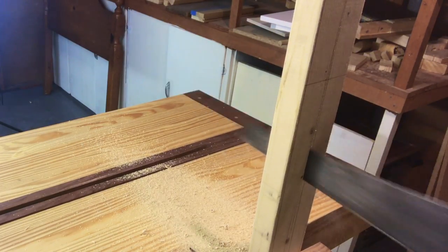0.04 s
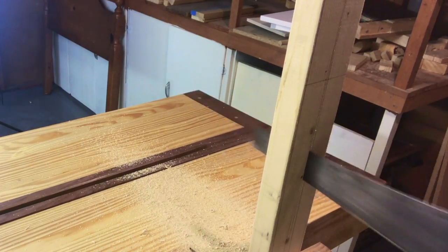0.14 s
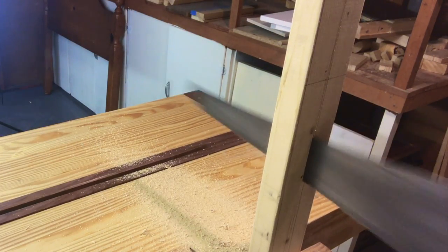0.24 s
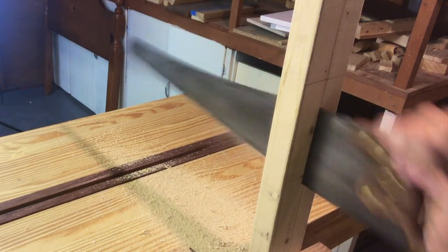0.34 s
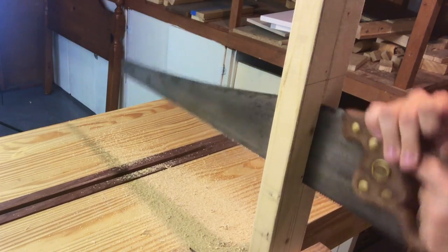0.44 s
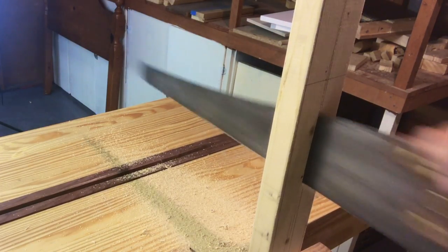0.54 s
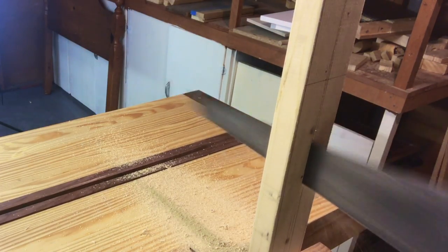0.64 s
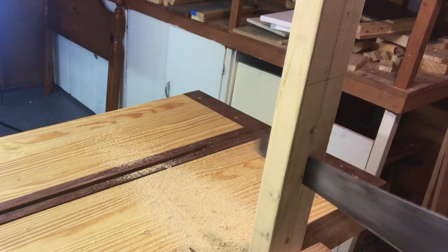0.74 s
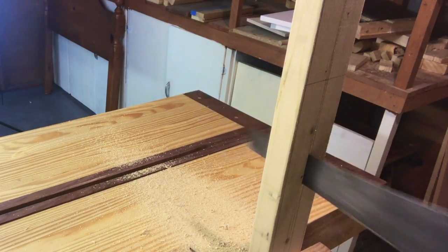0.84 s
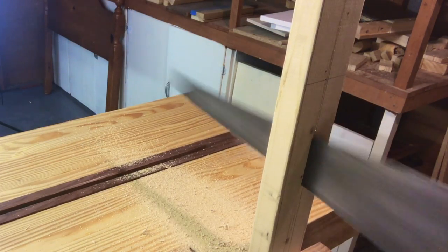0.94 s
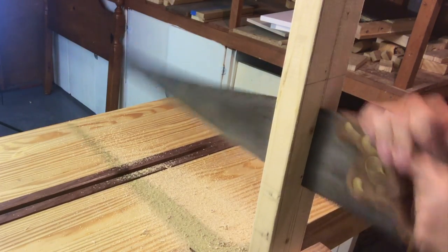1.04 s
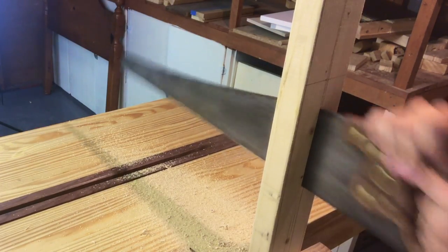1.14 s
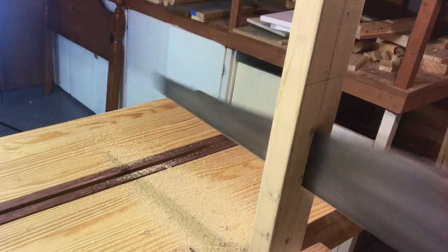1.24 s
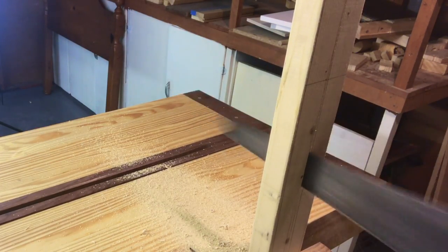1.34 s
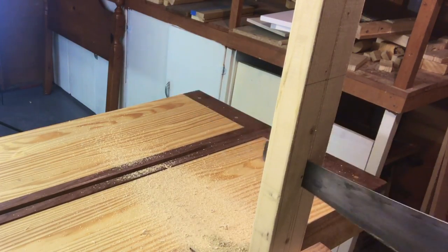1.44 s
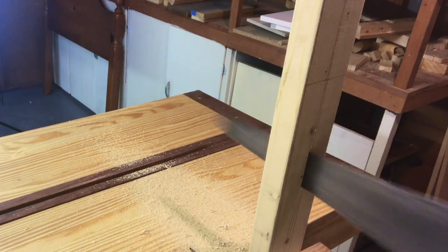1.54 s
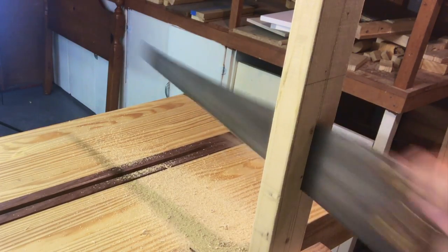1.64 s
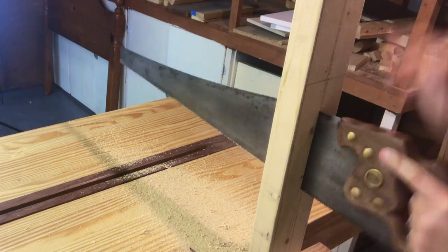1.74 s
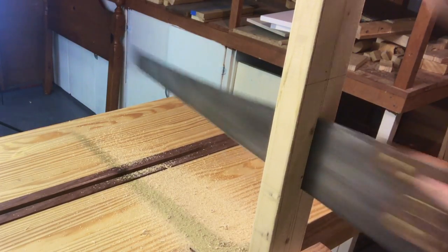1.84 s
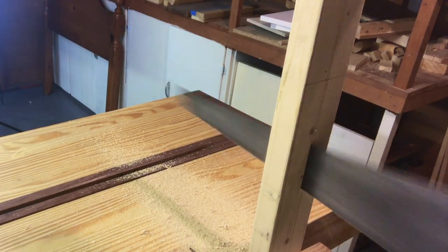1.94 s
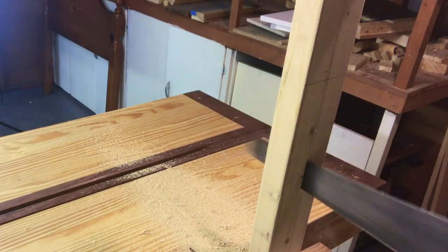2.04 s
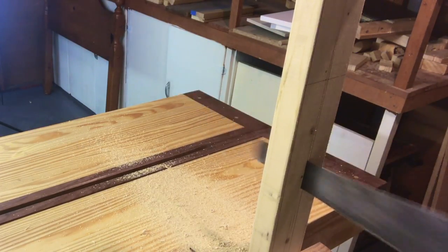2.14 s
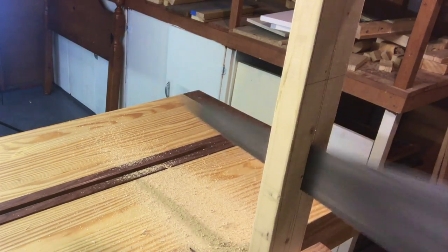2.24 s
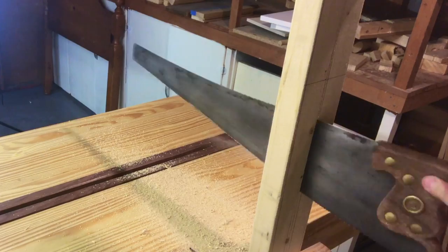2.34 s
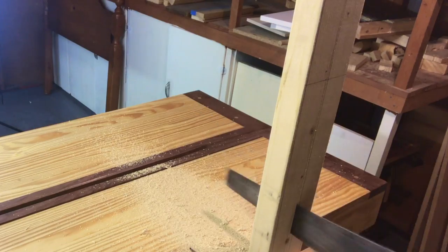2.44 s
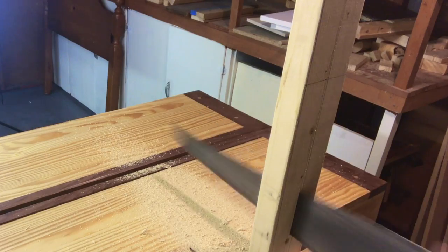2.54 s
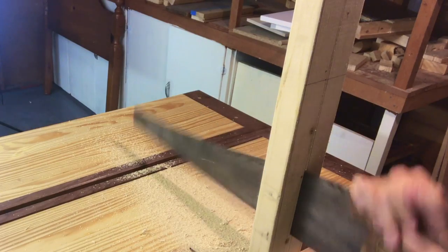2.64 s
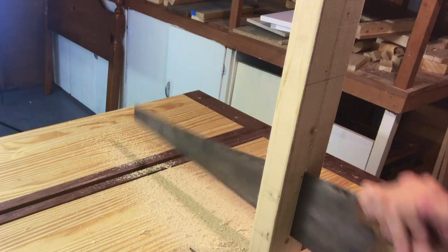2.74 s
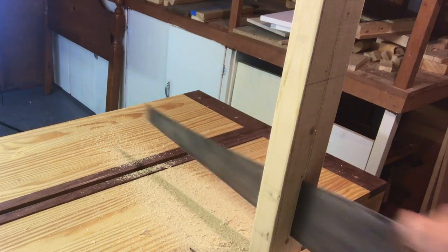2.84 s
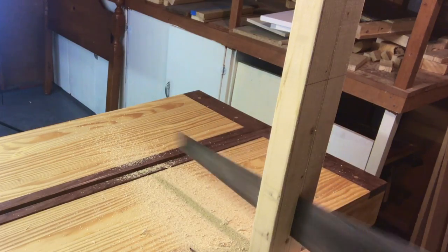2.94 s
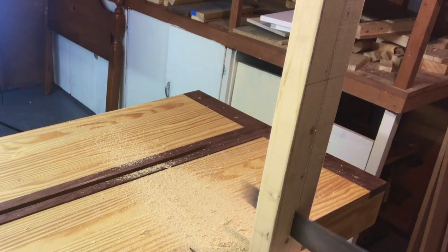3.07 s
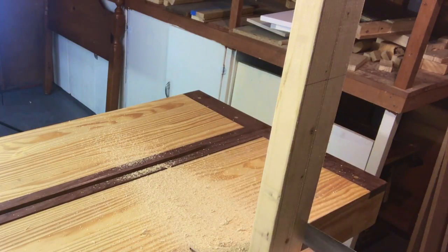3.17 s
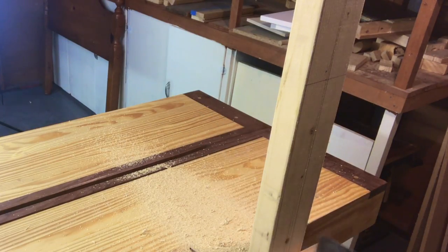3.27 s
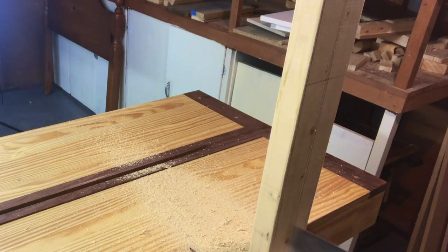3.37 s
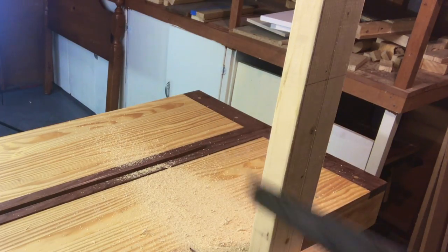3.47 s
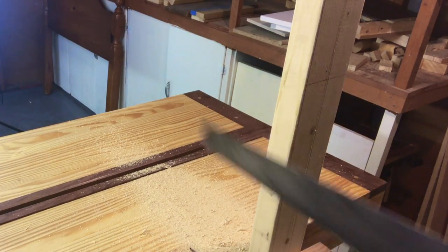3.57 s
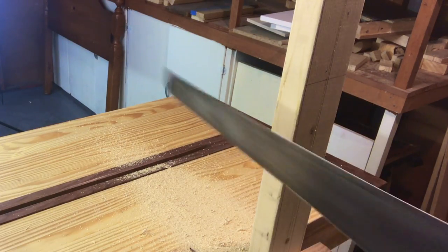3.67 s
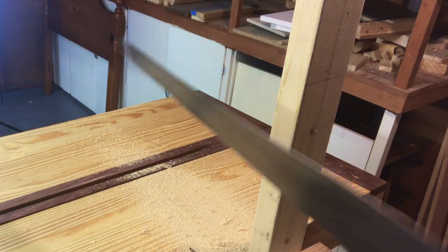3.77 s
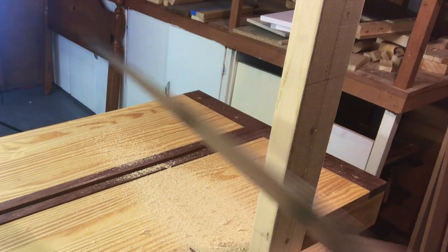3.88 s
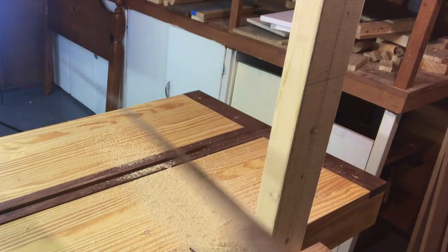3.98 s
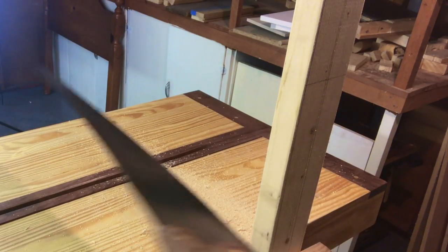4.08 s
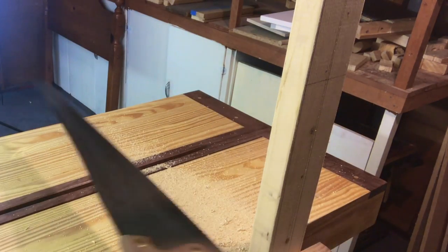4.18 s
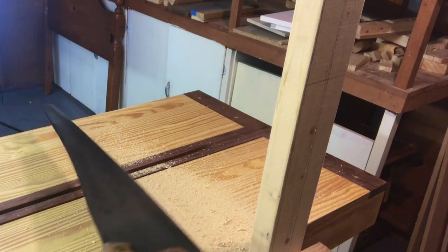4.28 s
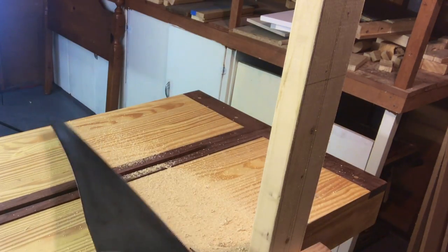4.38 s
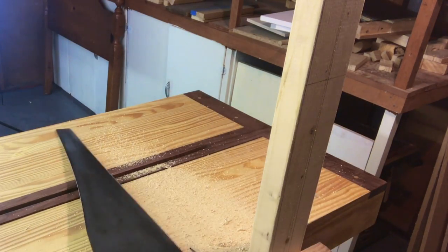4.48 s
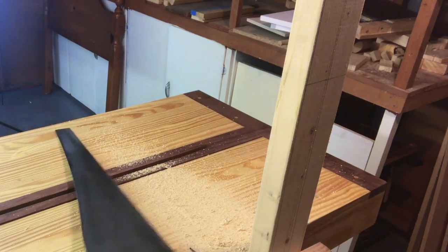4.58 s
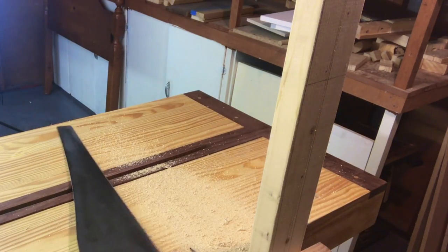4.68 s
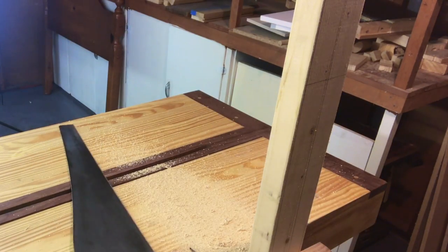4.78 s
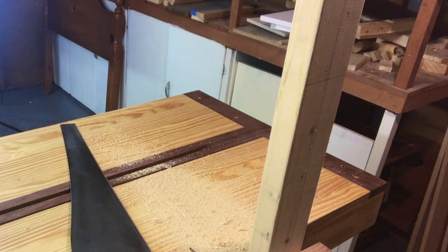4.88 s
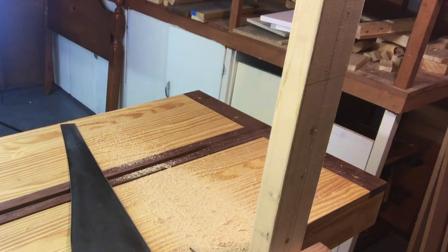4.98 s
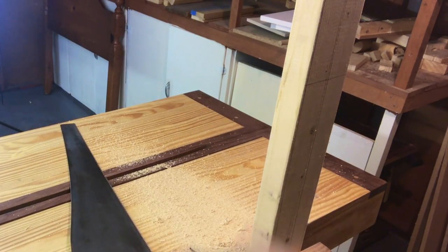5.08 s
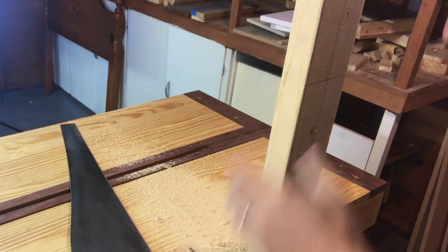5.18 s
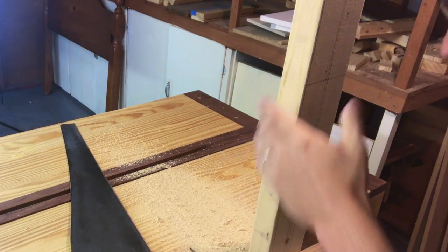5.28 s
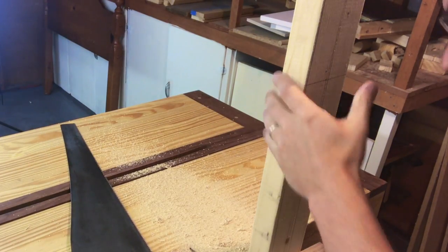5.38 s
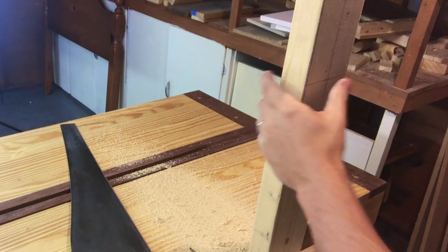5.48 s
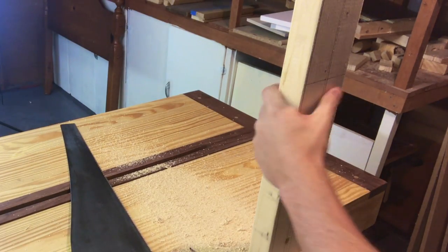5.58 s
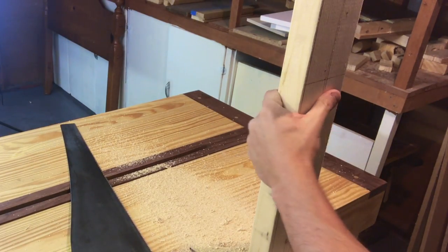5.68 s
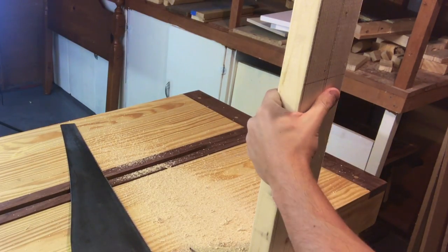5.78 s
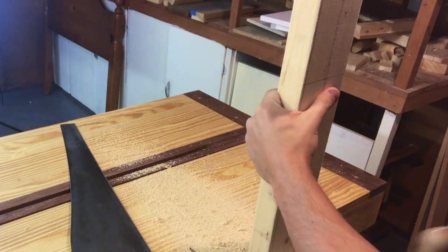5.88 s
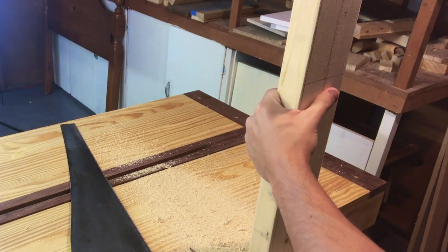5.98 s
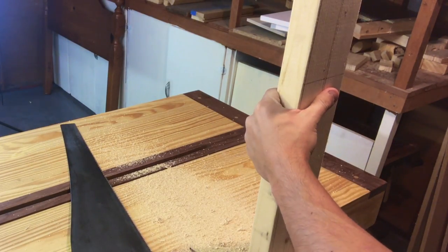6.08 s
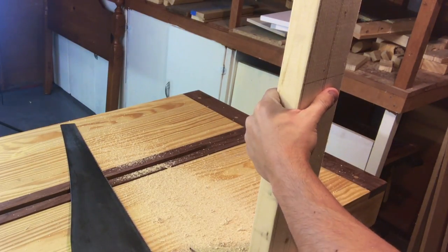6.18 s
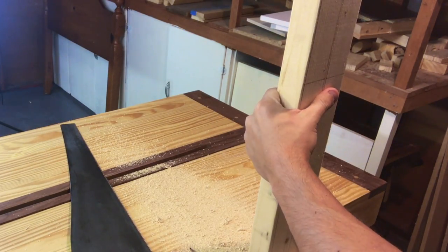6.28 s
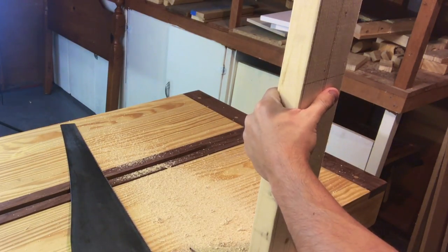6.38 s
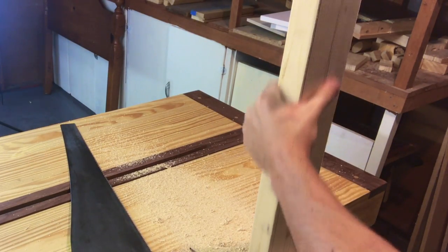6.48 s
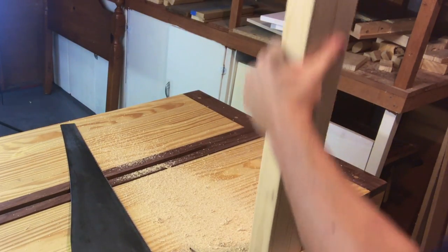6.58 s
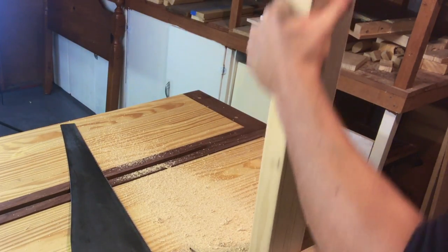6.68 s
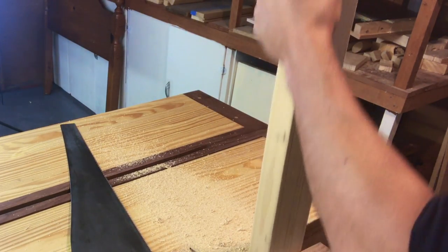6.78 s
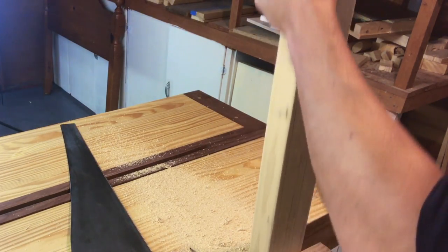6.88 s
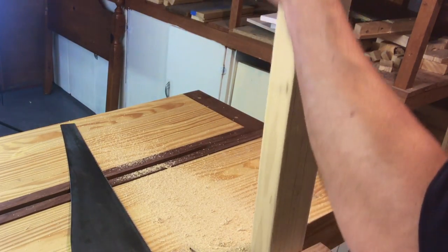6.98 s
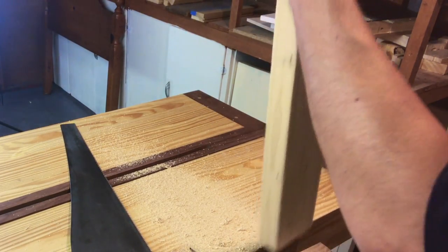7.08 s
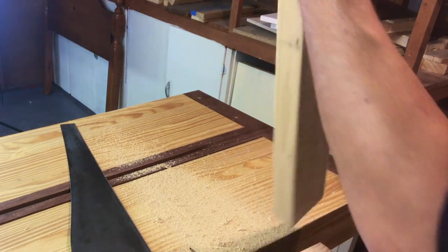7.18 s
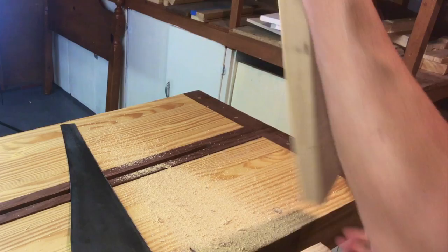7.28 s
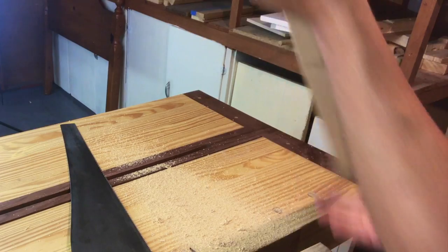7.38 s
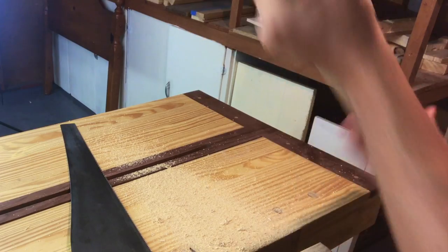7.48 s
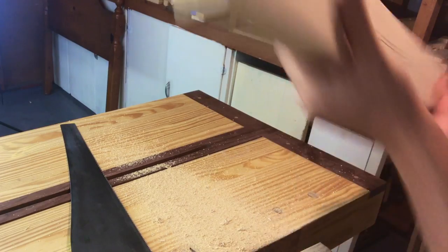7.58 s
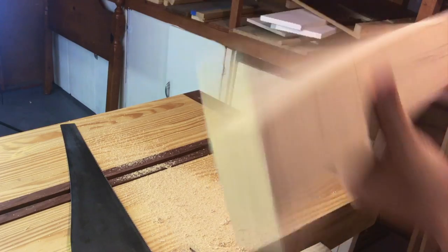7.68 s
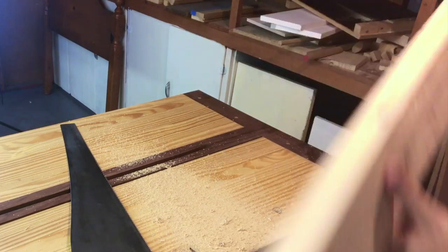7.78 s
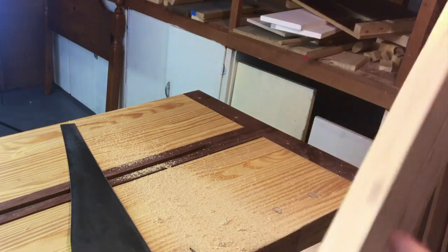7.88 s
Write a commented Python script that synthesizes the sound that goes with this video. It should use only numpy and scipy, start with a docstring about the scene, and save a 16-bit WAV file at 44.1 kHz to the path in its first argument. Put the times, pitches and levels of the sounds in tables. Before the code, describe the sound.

Close to the microphone, a hand saw rasps back and forth through wood, the blade ringing slightly and the bench rumbling. The strokes end, a few light taps follow, and the blade rattles down onto the workbench. Quiet handling and two small bumps lead to a loud wooden knock as the board is released, then soft rubbing. The small workshop hums faintly throughout.

```python
"""A rip saw cuts down a pine stud clamped to a bench, close to one microphone in a small workshop.
Its teeth tear fibres in loud pushes and softer pulls, ringing stud and blade and shaking the bench.
The saw is laid down and metal clatters; a hand takes the stud, the vise lets go with a knock
and the stud slides out. Behind it all the room hums low."""
import sys
import numpy as np
from scipy import signal
from scipy.fft import rfft, irfft, next_fast_len
from scipy.io import wavfile
from scipy.ndimage import uniform_filter1d, map_coordinates

SR = 44100
rng = np.random.default_rng(int(sys.argv[2]) if len(sys.argv) > 2 else 0)


def output_pcm(signal):
    """Save a mono or channel-first signal as 16-bit PCM at the path in sys.argv[1].

    Samples are clipped to [-1, 1] before scaling.
    """
    pcm = np.clip(np.atleast_2d(signal).T, -1, 1) * 32767
    wavfile.write(sys.argv[1], SR, np.round(pcm).astype(np.int16))


N = 349272

# saw strokes: (fastest at [s], speeding up [s], slowing down [s], tearing [dB], stud [dB], blade [dB],
# rasp [dB], bench [dB], stud lag [s], blade lag [s])
SAW_STROKES = [(0.079, 0.11, 0.1, -24, -31.5, -32, -21, -37.5, -0.013, 0.044),
               (0.379, 0.14, .11, -14.5, -21, -17.5, -18, -33.5, 0.0018, -0.00064),
               (0.749, 0.2, 0.14, -23, -32, -32, -22.5, -32.5, 0.0029, -0.072),
               (1.049, .13, 0.11, -13.5, -21, -18, -17.5, -38.5, 0.016, 0.026),
               (1.39, 0.18, .15, -23, -32, -27, -22.5, -34, 0.03, 0.0042),
               (1.702, 0.13, 0.11, -15, -22.5, -14.5, -17, -35, 0.0076, 0.012),
               (2.071, 0.22, 0.14, -26, -32.5, -30.5, -24, -38.5, 0.023, -0.011),
               (2.36, .12, 0.095, -14.5, -24, -20.5, -18, -38, 0.013, 0.033),
               (2.67, 0.1, 0.099, -15, -25.5, -11.5, -18.5, -36, 0.02, -0.021),
               (3.08, 0.24, 0.25, -29.5, -36, -28, -26.5, -41, -.02, -0.022)]
# each layer's peak within a stroke: (exponent of time [1], drop over the rise or fall time [dB])
TEAR_SHAPE, STUD_SHAPE, BLADE_SHAPE = (2.1, 20.5), (3.5, 9.7), (1.67, 27)
RASP_SHAPE, BENCH_SHAPE = (2.53, 16.7), (1.4, 7.1)
# the blade out of the kerf: (time [s], frequency [Hz], level [dB], t60 [s], stilled at [s])
FREE_BLADE = (3.39, 926.5, -53, 2.5, 3.52)
# the saw's clearest contacts with the bench: (time [s], click [dB], ring [dB])
CONTACTS = [(4.4959, -22, -32.5), (4.5457, -32.5, -36.5), (4.6333, -37, -39), (4.6438, -31, -46.5),
            (4.6934, -32, -27), (4.7149, -22.5, -31), (4.7244, -23, -36.5), (4.747, -20.5, -35),
            (4.7924, -9.5, -22.5), (4.833, -5.5, -20), (4.8685, -18.5, -19), (4.9042, -10, -21.5),
            (4.9136, -4, -30.5), (4.9264, -7.5, -25.5), (4.9495, -13.5, -60.5), (4.9885, -23, -32.5),
            (5.1, -35, -43)]
# knocks and taps on wood: (time [s], body [dB], crack [dB], edge [dB])
BLOWS = [(3.684, -32, -49, -56), (3.759, -34, -40, -54.5), (3.853, -46, -50, -47.5),
         (3.935, -44, -62, -42.5), (4.274, -44, -40, -46), (4.498, -20, -21.5, -19), (4.633, -32, -34, -27),
         (4.69, -13, -22.5, -32.5), (5.492, -32, -55, -53), (6.007, -33, -60, -44.5),
         (6.261, -22.5, -46, -61), (6.325, -20.5, -45, -59), (6.544, -1, -14.5, -28),
         (7.836, -42, -65, -52.5), (7.897, -43, -64, -54)]
# hands, cloth and wood brush past: (peak [s], rise [s], hold [s], fall [s], hiss [dB], top [dB], rub [dB])
BRUSHES = [(3.55, .03, 0.0036, .05, -57, -65.5, -67.5), (3.691, 0.01, 0.033, .09, -57, -58, -72),
           (3.926, 0.15, 0.019, 0.48, -57, -57.5, -71), (4.286, .015, 0.19, .03, -56.5, -73, -59.5),
           (5.302, 0.32, 0.071, 0.16, -48, -59, -56.5), (5.42, .03, 0.055, 0.08, -54, -54.5, -60),
           (5.626, .08, 0.021, .08, -60, -54, -71), (5.898, 0.42, 0.019, .15, -60, -67, -61),
           (6.052, .08, 0.054, .5, -62, -69, -61), (6.325, .12, 0.031, .2, -66, -65.5, -77),
           (6.601, 0.11, 0.0092, 0.13, -50, -49, -44.5), (6.736, 0.25, 0.32, 0.18, -55.5, -53, -52),
           (7.524, 0.018, 0.0048, 0.062, -57.5, -58, -62.5), (7.647, .09, 0.024, .2, -56, -57.5, -66),
           (7.91, .09, .02, .1, -54, -57, -65.5)]
# the vise turns: (peak [s], rise [s], hold [s], fall [s], level [dB])
VISE_TURN = (6.05, 1.3, -0.07, 0.8, -67.5)
# a small metal part of the vise: (frequency [Hz], relative level [dB], t60 [s])
PING_MODES = [(1620, 0, 0.071), (2650, -6, .06), (3250, -8, 0.1)]

# resonances: (frequency [Hz], width [Hz], gain [dB])
STUD_MODES = [(455, 28, -3.5), (507.4, 41, -8), (559.3, 28, -1.5), (604.3, 16, -0.4), (640, 57, -9),
              (703, 41, -4.5)]
BLADE_MODES = [(1304, 35, -10), (1377, 25, -0.5), (1433, 26, 2), (1542, 9, -6)]
WEAK_MODES = [(364.4, 64, -0.5), (1104, 30, 3.5), (1290, 9.9, -9.5), (1630, 20, -7), (2060, 13, -11.5),
              (2270, 26, -9.5), (2310, 16, -7.5), (2585, 31, -8.5), (2690, 23, 4.5), (3210, 30, -7),
              (3640, 31, -13.5)]  # of stud and blade
BENCH_MODES = [(91, 21, 5), (159, 14, -7), (192.6, 22, 2.5), (293, 20, 4.5)]
METAL_MODES = [(895, 59, -11.5), (1083, 22, -3), (1247, 27, 2), (1341, 35, -4), (1790, 20, -14.5),
               (2025, 25, -8), (2180, 30, -19.5), (2520, 12, -11.5), (2826, 60, -17), (3490, 33, -16),
               (4360, 38, -27)]
WOOD_MODES = [(190, 120, -11), (319, 34, 4.5), (489, 41, -1.5), (602, 74, -0.5), (878, 160, 2),
              (1136, 180, -2.5)]
RUB_MODES = [(900, 120, 2), (1097, 47, 13.5), (1280, 60, -6), (1700, 85, 5), (1964, 42, 6.5),
             (2450, 19, -11.5)]  # the sliding stud
VISE_MODES = [(2990, 70, 8), (3830, 46, 8.5), (4400, 70, 5.5)]

# noise spectra: (frequency [Hz], relative density [dB])
TEAR_SPECTRUM = [(1470, -41), (2500, -4), (2680, -2), (3980, -8), (4580, -5.5), (4950, -6), (5870, -3),
                 (7710, -3.5), (8460, -7.5), (10400, -9.5), (11300, -9.5), (15000, -11.5), (16000, -22)]
RASP_SPECTRUM = [(250, -40), (420, -6.5), (800, -7), (1100, -1), (1700, 0.5), (2000, -3.5), (2700, -4),
                 (3300, -7), (4500, -15.5), (7000, -60.5)]  # wood chatter
CLICK_SPECTRUM = [(1500, -41.5), (2500, -11), (4500, -1.5), (7000, -11.5), (9500, 2.5), (12000, 3),
                  (15000, -7), (16000, -8)]
SCRAPE_SPECTRUM = [(880, -18.5), (1500, 4.5), (1860, -10.5), (2150, 0), (3300, -11), (3500, -5.5),
                   (5530, -7), (6520, -11.5), (9000, -11), (11700, -42), (19800, -120)]
CRACK_SPECTRUM = [(700, -6.5), (1300, 0.5), (2000, -3.5), (2600, -13.5), (3300, -7), (4000, -22),
                  (6000, -37)]
HISS_SPECTRUM = [(1470, -40.5), (2500, -7), (2780, -9.5), (3180, -7), (4050, -7), (4880, -5), (6070, 1),
                 (7170, -5), (8020, -3.5), (8480, -10.5), (9360, -6), (10100, -19.5), (11000, -18),
                 (14300, -42), (22000, -120)]
HISS_TOP_SPECTRUM = [(5000, -29.5), (8000, -9.5), (10400, -5.5), (12500, -1), (15000, -5), (16000, -4)]
ROOM_SPECTRUM = [(13, -29), (22, -5.5), (53, 1), (92, -8.5), (140, -3.5), (211, -12.5), (356, -11),
                 (409, -17.5), (482, -16), (771, -25), (1100, -25.5), (5030, -35.5), (6440, -32),
                 (13900, -40.5), (16000, -40)]

# background hum: (frequency [Hz], width [Hz], level [dB])
HUM_BANDS = [(74.6, 14, -49.5), (116.8, 2.2, -52)]
# the workshop's decay: (frequency [Hz], t60 [s])
ROOM_DECAY = [(150, 1), (1200, 0.52), (4000, 0.29), (12000, 0.28)]
# bands cancelled by the microphone's housing: (frequency [Hz], width [Hz], depth [0-1])
MIC_DIPS = [(4960, 150, 0.36), (10440, 340, .5)]


def saw():
    """Many teeth tear fibres at once; the tearing rings the stud and the blade."""
    tear_db, stud_db, blade_db, rasp_db, _, stud_lag, blade_lag = np.transpose(SAW_STROKES)[3:]
    tearing = strokes(tear_db, TEAR_SHAPE)
    teeth_hz = 900 * np.sqrt(tearing) * amp(.8 * wobble(40))  # faster strokes are louder
    bite = 1 + 0.11 * np.cos(2 * np.pi * np.cumsum(teeth_hz) / SR)
    fibres = bite * grit(spread_db=2, clump_db=0.73)
    shimmer = flicker(fibres, depth_db=3.5)
    rasp = unit(coloured(shimmer, RASP_SPECTRUM)) + amp(-12) * unit(ringing(fibres, WEAK_MODES))
    stud = unit(ringing(flicker(fibres, depth_db=3), STUD_MODES))
    return (tearing * unit(coloured(shimmer, TEAR_SPECTRUM))
            + strokes(rasp_db, RASP_SHAPE) * rasp
            + strokes(stud_db, STUD_SHAPE, stud_lag) * stud
            + strokes(blade_db, BLADE_SHAPE, blade_lag) * unit(ringing(shimmer, BLADE_MODES)))


def strokes(levels_db, shape, lag_s=0):
    """One layer's gain as the saw speeds up and slows down in each stroke."""
    fastest, rise, fall = np.transpose(SAW_STROKES)[:3]
    return sum(swell(s, up, 0, down, db, *shape)
               for s, up, down, db in zip(fastest + lag_s, rise, fall, levels_db))


def flicker(x, depth_db):
    """The blade's small modes light up as its free length changes: narrow, short patches of random gain."""
    bands = signal.stft(x, nperseg=512)[2]
    patches = uniform_filter1d(rng.standard_normal(bands.shape), size=6, axis=1)
    return unit(signal.istft(bands * amp(depth_db * unit(patches)), nperseg=512)[1][:N])


def bench_rumble():
    """The bench top shakes under the saw, peaking just ahead of each stroke."""
    shaking = ringing(grit(spread_db=-1, clump_db=1), BENCH_MODES)
    rumble = unit(ringing(shaking, [(137, 42, 0)]))
    bench_db = np.transpose(SAW_STROKES)[7]
    return strokes(bench_db, BENCH_SHAPE, lag_s=-0.044) * amp(2.5 * wobble(9)) * rumble


def freed_blade():
    """The blade leaves the kerf and rings in one mode until it is stilled."""
    start, hz, db, t60, stilled = FREE_BLADE
    t = np.maximum(np.arange(N) / SR - start, 0)
    damping_db = 60 * np.maximum(t + start - stilled, 0) / 0.17
    attack = 1 - np.exp(-t / 0.023)
    return amp(db - 60 * t / t60 - damping_db) * attack * np.sin(2 * np.pi * hz * t)


def clatter():
    """The saw rattles on the bench: bright clicks over a rough ring, a scrape and a dull thud."""
    times, click_db, ring_db = np.transpose(CONTACTS)

    def after_contacts(decay_s, rise_s):
        return sum(swell(s + rise_s, rise_s, 0, decay_s / 3, db) for s, db in zip(times, ring_db))

    slips = grit(spread_db=1, clump_db=2)
    rattling = after_contacts(.22, .002)
    ring = unit(ringing(slips, METAL_MODES)) * after_contacts(.21, .011)
    clang = ringing(strikes(times, ring_db + 24), METAL_MODES)
    scrape = unit(coloured(flicker(slips, depth_db=2.5), SCRAPE_SPECTRUM)) * rattling
    thud = unit(ringing(slips, [(184, 280, -2.5), (348.5, 240, 0), (622, 430, -9)]))
    thud *= after_contacts(.3, .011)
    return ring + clang + amp(-5) * scrape + amp(-16) * thud + clicks(times, click_db, rattling)


def clicks(times, levels_db, rattling, ticks_per_s=95):
    """Each metal contact is a push, a snap and a short sizzle; small ticks chatter unevenly between."""
    tick_count = np.floor(np.cumsum(ticks_per_s * amp(4 * wobble(70))) / SR)
    ticks = np.diff(tick_count, prepend=0) * amp(-2 + 2.5 * rng.standard_normal(N)) * rattling
    puff = rng.standard_normal(SR // 20) * amp(-60 * np.arange(SR // 20) / SR / .003)
    snaps = bursts(times, levels_db, t60=.003) + signal.fftconvolve(ticks, puff)[:N]
    sizzle = bursts(times, levels_db - 15, t60=.045)
    pushes = strikes(times, levels_db) + ticks
    return coloured(amp(9) * pushes + snaps + sizzle, CLICK_SPECTRUM)


def knocks():
    """Blows ring the wood, the lowest modes building up late. Returns the body and its bright crack."""
    times, body_db, crack_db, edge_db = np.transpose(BLOWS)
    force = bursts(times, body_db, t60=0.072, rise_s=0.0042) + strikes(times, body_db + 2)
    body = ringing(ringing(force, WOOD_MODES), [(507, 2000, 0)])
    thump = ringing(bursts(times, body_db + 3, t60=0.12, rise_s=.02), WOOD_MODES[:3])
    crack = coloured(bursts(times, crack_db, t60=0.045), CRACK_SPECTRUM)
    edge = coloured(bursts(times, edge_db, t60=0.012), TEAR_SPECTRUM)
    return body + thump, crack + edge


def vise_ping(start_s=5.751, level_db=-46.5):
    """A small metal part of the vise is touched and rings briefly."""
    t = np.maximum(np.arange(N) / SR - start_s, 0)
    return sum(amp(level_db + db - 60 * t / t60) * np.sin(2 * np.pi * hz * t)
               for hz, db, t60 in PING_MODES)


def handling():
    """Soft friction at the bench: a hiss, its fine top, a duller rub and the turning vise's thin whine."""
    hiss, top, rubbing = (sum(swell(*row[:4], row[k]) for row in BRUSHES) for k in (4, 5, 6))
    slips = grit(spread_db=2, clump_db=0.9)
    rub = unit(ringing(slips, RUB_MODES)) + amp(5) * unit(coloured(slips, RASP_SPECTRUM))
    return (hiss * unit(coloured(slips, HISS_SPECTRUM))
            + top * unit(coloured(slips, HISS_TOP_SPECTRUM))
            + (rubbing + amp(-68.5)) * unit(rub)  # someone keeps moving about
            + swell(*VISE_TURN) * unit(ringing(slips, VISE_MODES)))


def room_tone():
    """Steady workshop air with a low, wavering hum."""
    air = unit(filtered(rng.standard_normal(N), lambda hz: amp(along(ROOM_SPECTRUM, hz))))
    hum = sum(amp(db) * unit(ringing(rng.standard_normal(N), [(hz, width, 0)]))
              for hz, width, db in HUM_BANDS)
    return amp(-50.5) * air + hum


def reverb(x):
    """The near walls answer 7 ms after the direct sound; the lows linger longest."""
    hz, t, bands = signal.stft(rng.standard_normal(SR // 2), SR, nperseg=256)
    tail = signal.istft(bands * amp(-60 * t / along(ROOM_DECAY, hz)[:, None]), SR, nperseg=256)[1]
    return signal.fftconvolve(np.pad(x, (300, 0)), tail / np.linalg.norm(tail))[:N]


def grit(spread_db, clump_db):
    """Dense random slips of uneven size that come in clumps, rms 1."""
    size_db = spread_db * np.minimum(rng.exponential(size=N), 5) + clump_db * (wobble(60) + wobble(250))
    return unit(rng.standard_normal(N) * amp(size_db))


def bursts(times, levels_db, t60, rise_s=.0001):
    """A short dying puff of noise at each time."""
    out, t = np.zeros(N + SR), np.arange(1, SR // 10) / SR
    attack = 1 - np.exp(-t / rise_s)
    for s, db in zip(times, levels_db):
        out[round(s * SR):][:len(t)] += amp(db - 60 * t / t60) * attack * rng.standard_normal(len(t))
    return out[:N]


def strikes(times, levels_db):
    """One sharp push at each time, slightly uneven in strength."""
    return np.bincount(np.round(times * SR).astype(int), amp(levels_db + rng.normal(0, 1, len(times))), N)


def swell(peak_s, rise, hold, fall, db, power=0.91, drop_db=19):
    """Gain that climbs drop_db over the rise time, holds, and sinks drop_db over the fall time."""
    t = np.arange(0, N, 8) / SR - peak_s
    away = np.maximum(-t, 0) / abs(rise) + np.maximum(t - abs(hold), 0) / abs(fall)
    return np.repeat(amp(np.maximum(db - drop_db * away ** power, -140)), 8)[:N]


def ringing(x, modes):
    """x through resonances of alternating sign."""
    return filtered(x, lambda f: sum((-1) ** k * amp(db) * 1j * f * width / (hz**2 - f**2 + 1j * f * width)
                                     for k, (hz, width, db) in enumerate(modes)))


def coloured(x, spectrum):
    """x through a minimum-phase filter, so that nothing sounds before a blow."""
    gain = amp(along(spectrum, np.fft.rfftfreq(4096, 1 / SR)))
    cepstrum = irfft(np.log(np.maximum(gain, 1e-6)))
    cepstrum[1:2048] *= 2
    cepstrum[2049:] = 0
    impulse = unit(irfft(np.exp(rfft(cepstrum)))) / np.sqrt(4096)
    return signal.fftconvolve(x, impulse)[:N]


def filtered(x, response):
    """x through a complex response of frequency."""
    size = next_fast_len(N + SR // 2)
    return irfft(rfft(x, size) * response(np.fft.rfftfreq(size, 1 / SR)), size)[:N]


def wobble(rate):
    """A smooth random curve, rate knots a second."""
    return map_coordinates(rng.standard_normal(int(N * rate / SR) + 4), [np.arange(N) * rate / SR])


def along(points, hz):
    """Interpolates (frequency [Hz], value) points on a log axis."""
    knots_hz, values = np.transpose(points)
    return np.interp(np.log(hz + 1), np.log(knots_hz + 1), values)


def amp(db):
    """dB to gain."""
    return 10 ** (np.asarray(db) / 20)


def unit(x):
    """Scaled to rms 1."""
    return x / np.sqrt(np.mean(x ** 2) + 1e-20)


def scene():
    """What reaches the microphone: all sources direct, plus the room's answer to cut, clatter and knocks."""
    cut, bench, metal = saw(), bench_rumble(), clatter()
    wood, crack = knocks()
    direct = cut + bench + metal + wood + crack + freed_blade() + vise_ping() + handling() + room_tone()
    return (direct + amp(-9) * reverb(cut) + amp(-8.5) * reverb(metal)
            + reverb(wood + amp(-4.5) * crack))[None]


def record(dry, low_cut_hz=29, top_hz=15900):
    """A mono microphone with two dips and a low cut; peaks round off at full scale below a band limit."""
    def microphone(f):
        dips = [1 - depth / (1 + (2 * (f - hz) / width) ** 2) for hz, width, depth in MIC_DIPS]
        return np.prod(dips, axis=0) / (1 + (low_cut_hz / (f + 1)) ** 6)

    x = filtered(dry[0], microphone)
    rounded = x / (1 + np.abs(x) ** 8) ** (1 / 8)
    return filtered(rounded, lambda hz: hz < top_hz)[None]


dry = scene()
out = record(dry)
output_pcm(out)
```